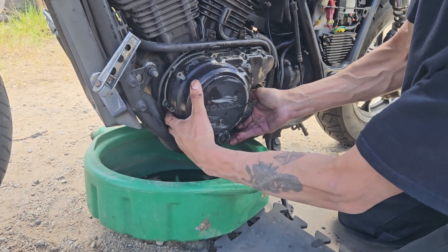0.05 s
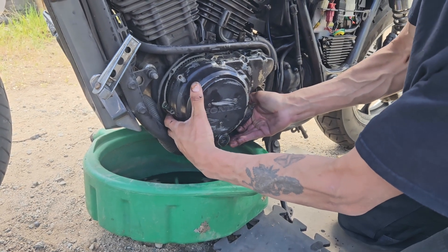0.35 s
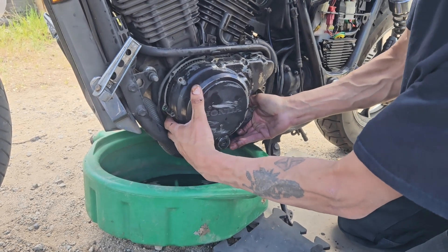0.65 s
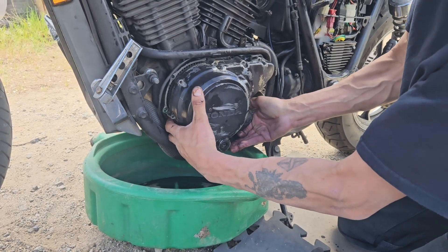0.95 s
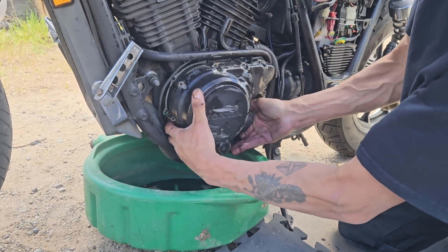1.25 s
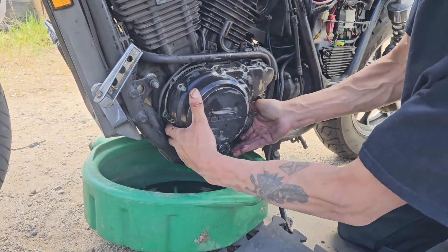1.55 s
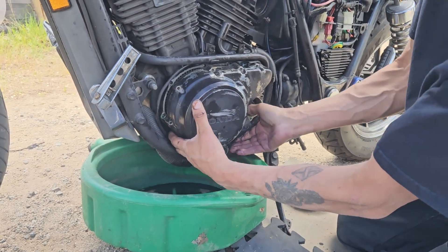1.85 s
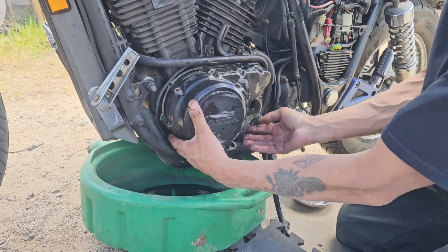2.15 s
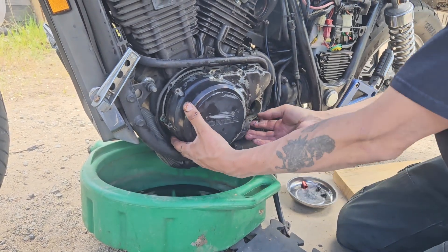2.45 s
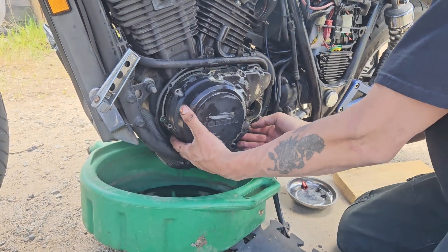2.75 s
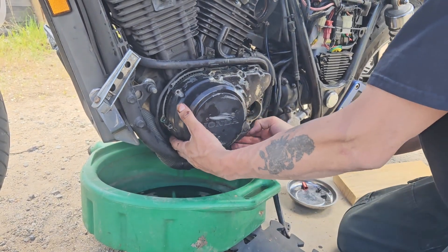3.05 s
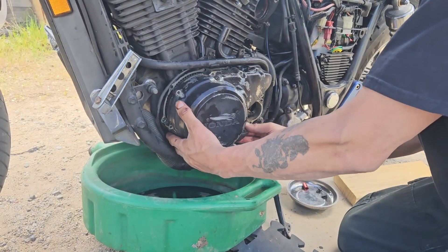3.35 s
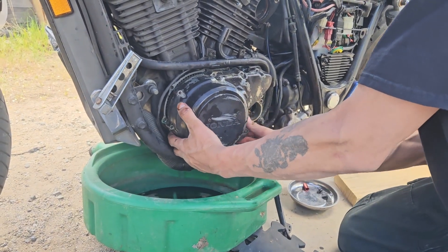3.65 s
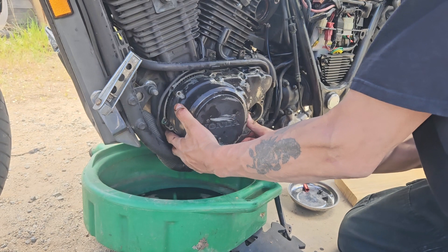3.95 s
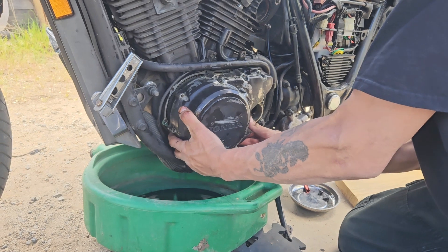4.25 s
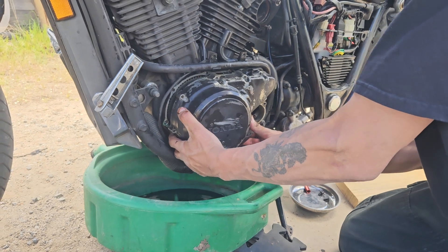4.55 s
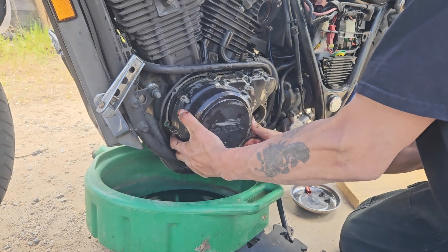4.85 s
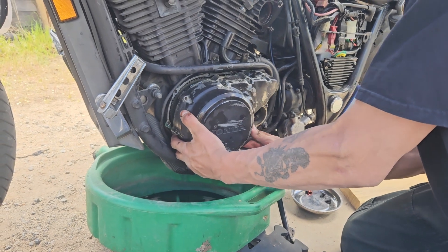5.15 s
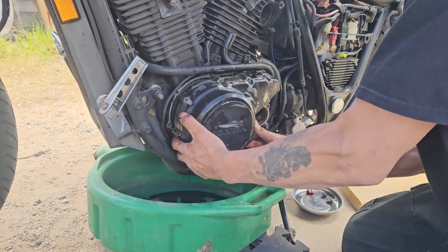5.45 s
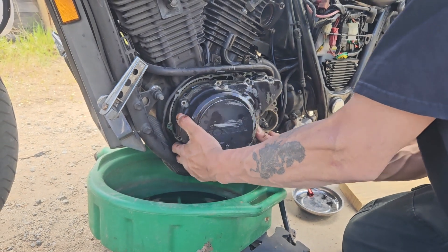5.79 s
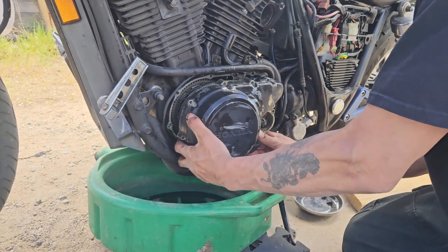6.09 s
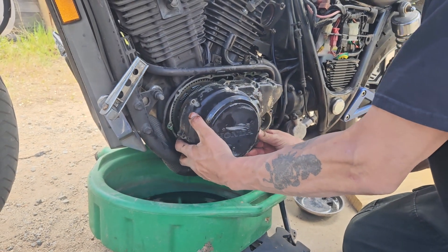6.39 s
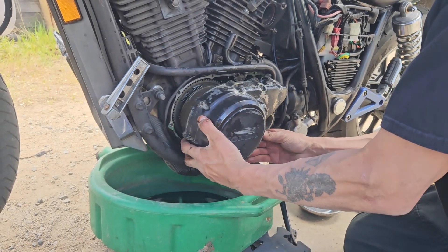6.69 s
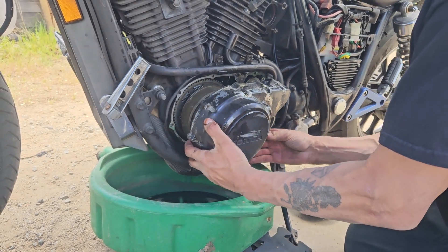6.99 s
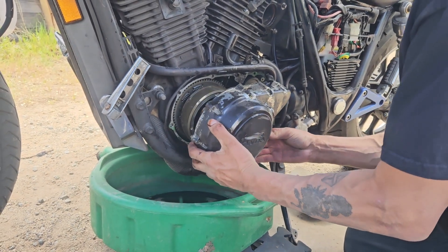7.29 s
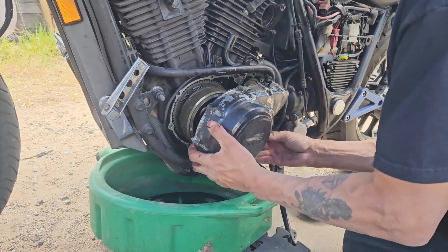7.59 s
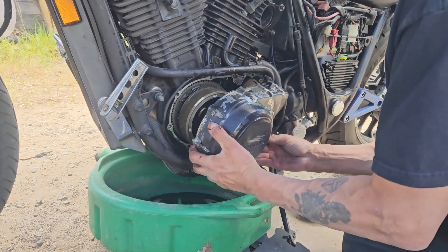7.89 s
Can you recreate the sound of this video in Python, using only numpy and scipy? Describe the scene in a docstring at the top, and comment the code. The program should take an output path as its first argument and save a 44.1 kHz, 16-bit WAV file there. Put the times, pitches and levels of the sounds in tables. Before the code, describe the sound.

Hands work a metal engine cover loose outdoors, with clinks, scrapes and knocks and one loud clank, over a low rumble.

```python
"""A cast metal side cover is rocked off a motorcycle engine by two hands, outdoors. It ticks, scrapes,
knocks on the crankcase and breaks free with one loud clank; each contact is a noise burst plus the
cover's ringing modes. The still-tight cover and small steel pieces clink, hands rub, clothes rustle.
Behind it an engine idles, a far exhaust booms as it revs through resonances, a far car horn toots
twice and songbirds whistle."""
import sys
import numpy as np
from scipy import signal
from scipy.fft import rfft, irfft
from scipy.io import wavfile
from scipy.ndimage import uniform_filter1d

SR = 44100
rng = np.random.default_rng(int(sys.argv[2]) if len(sys.argv) > 2 else 0)


def wrap_up_sound(samples):
    """Save the sound to the file named by the first command line argument, as 16-bit audio."""
    columns = np.atleast_2d(samples).T
    # keep every value between -1 and 1, then stretch to whole-number steps
    tamed = np.clip(columns, -1, 1)
    steps = np.round(tamed * 32767).astype(np.int16)
    wavfile.write(sys.argv[1], SR, steps)


N = 349713

# cover modes, tight on the gasket and loosened: pitch_hz, level_db, t60_s
TIGHT_MODES = [(676, 12, 0.16), (953, 18.5, 0.12), (1026, 28, 0.025), (1284, 8, .039), (1704, 14, 0.061),
               (3450, 14, 0.076), (4140, 18, 0.06), (4770, 20.5, 0.066), (5820, 1, 0.036),
               (7270, 28, 0.036), (8300, 21.5, .06)]
LOOSE_MODES = [(215, -7, .08), (452, -1, .07), (538, -9, .1), (780, -14, .06), (1001, -5, .05),
               (1138, 3.5, .07), (1328, -9, .05), (1412, -2, .06), (1580, -11, .05), (2038, -12, .05),
               (2195, -11, .06), (2438, -4, .08), (2826, -6, .07), (3275, -6, .07), (3450, -6, .05),
               (3644, -8, .05), (3751, -10, .06), (4179, -5, .07), (4543, -9, .05), (5340, -8, .07),
               (6061, -9, .07), (6436, 1, .06), (6688, -5, .07), (6864, -4, .06), (7075, -5, .07),
               (8260, -12, .06)]

def cover_modes(at_s, ratio=1, loose_s=1.5, grip_damping=.72):
    """The cover rings differently once loosened; the hands shorten the ring."""
    modes = TIGHT_MODES if at_s < loose_s else LOOSE_MODES
    return [(hz * ratio, db, t60 * grip_damping) for hz, db, t60 in modes]


# thud, clank, clink and fizz bands: low_hz, high_hz, side_db, ring_db
CONTACT_BANDS = [(200, 700, -11, -1), (700, 2200, -8, 0), (2450, 7900, -1, 0), (8500, 16000, 0, -10)]

def contact(rise_s, length_s, pan_db, levels_db, modes,
            edge_hz=2050, ring_db=-1, grit=.45, scatter_db=-14):
    """One grinding contact: a burst of tiny impacts that feeds the cover's modes."""
    t = np.arange(SR // 6) / SR
    force = np.minimum(t / rise_s, 1) * np.exp(-(np.maximum(t - rise_s / 2, 0) / length_s) ** 2)

    def decay(t60_s):
        """Envelope of a vibration fed by the force."""
        pole = np.exp(-2 * np.log(1000) / (t60_s * SR))
        return np.sqrt(signal.lfilter([1], [1, -pole], force ** 2))

    impacts = unit_rms(force * np.exp(grit * wobble(len(t), 30)))
    rebounds = gain(scatter_db) * unit_rms(decay(.12))  # among the engine parts
    crunch = unit_rms(np.hypot(impacts, rebounds) * rng.standard_normal((2, len(t))))
    ring = np.zeros_like(crunch)
    for hz, db, t60_s in modes:
        gripped_hz = hz * (1 + .003 * rng.standard_normal())
        cycles = gripped_hz * t + rng.random()
        cycles = cycles + np.array([[0], [rng.choice([-1, 1]) / 4]])  # side in quadrature
        ring += gain(db + 2.2 * rng.standard_normal()) * decay(t60_s) * np.sin(2 * np.pi * cycles)
    ring = unit_rms(ring) * gain(ring_db) * min((rise_s + length_s) / .011, 1)  # brief snaps ring less
    bands = np.array(CONTACT_BANDS, float)
    bands[1, :2] = .39 * edge_hz, edge_hz  # harder contact, higher clank band
    out = np.zeros_like(crunch)
    for (low_hz, high_hz, side_db, share_db), db in zip(bands, levels_db):
        mid, side = bandpass(crunch + gain(share_db) * ring, low_hz, high_hz, order=4)
        mid, side = unit_rms(mid), gain(side_db) * unit_rms(side)
        out += gain(db) * np.array([mid + side, mid - side])
    return out * np.sqrt(.02 / t[-1]) * pan(pan_db)  # levels count over 20 ms


# start_s, rise_s, length_s, pan_db, (thud_db, clank_db, clink_db, fizz_db)
RELEASE_BLOWS = [(5.8865, .002, 0.0053, 2, (-41, -26, -35.5, -52.5)),
                 (5.891, .002, .0065, 2.5, (-37, -30, -27.5, -48)),
                 (5.8983, .001, .0055, 2, (-46, -28, -32, -53.5))]

def release():
    """The cover breaks free: three blows merge into one clank."""
    out = np.zeros((2, N))
    for start_s, *blow in RELEASE_BLOWS:
        add(out, start_s, contact(*blow, cover_modes(start_s), ring_db=-3.5, grit=.5, scatter_db=-17))
    return out


# start_s, length_s, clank_db, thud_rel_db, clink_rel_db, pan_db, pitch_ratio, edge_hz
CRANKCASE_KNOCKS = [(0.625, 0.0056, -66, -22, -25, 0, 1.26, 1600),
                    (0.659, 0.0076, -59, -19, -13, -1, 1.2, 1800),
                    (1.11, 0.01, -47, -7, -20, 0, 1.09, 1400),
                    (1.121, 0.012, -51.5, -0.5, -13.5, -1, 1.1, 1500),
                    (1.304, 0.0067, -65.5, -3, -26, 0, 1.2, 1600),
                    (1.351, 0.0084, -68.5, 5, -15, -2, 0.98, 1700),
                    (2.136, 0.012, -46, -13, -11.5, 1, 0.95, 2250),
                    (2.773, .004, -60, 3.5, -16, 1, 0.86, 1600),
                    (2.789, .005, -54.5, 1.5, -6, -1, 0.78, 2200),
                    (2.865, 0.011, -61.5, 6, -12, 0, 1, 1600),
                    (2.991, 0.0079, -52.5, 4.5, -8, -2, 0.99, 2000),
                    (3.88, .017, -57.5, 3, -10.5, -0.5, 0.94, 1500),
                    (4.125, 0.01, -57.5, 9, -12.5, -1, 0.98, 1900),
                    (4.3142, 0.0033, -46.5, -7, -30, -0.5, 0.72, 1700),
                    (5.166, 0.02, -67.5, 15, -6.5, -2.5, 0.95, 1500),
                    (5.359, 0.0078, -46.5, 3.5, -2, 1.5, 0.98, 1300),
                    (5.635, 0.0044, -47, -1, -23, 0, 0.84, 2200),
                    (5.7793, 0.0042, -51.5, 17, -25, 3.5, 1.08, 1500),
                    (5.788, 0.0036, -53, 17.5, -27.5, -4.5, 1.01, 1400),
                    (5.83, 0.011, -44, -17, -13.5, 2, 1.02, 2000),
                    (5.854, 0.0081, -42, -16, -14.5, 0, 1.2, 1900),
                    (5.9405, 0.008, -35.5, -14, -16, 0.5, 0.99, 2100),
                    (6.003, .007, -53.5, -18, -8.5, -3, 1.13, 2200),
                    (6.094, 0.0046, -49.5, -18, -33, 2, 1.2, 2000),
                    (6.381, 0.0097, -37.5, -11, -30, -0.5, .98, 1750),
                    (6.472, 0.0039, -54, -9, -40, -1, 1, 1750),
                    (6.596, 0.0035, -63.5, -16, -21, 0, 1.1, 1800),
                    (6.686, 0.0056, -39.5, -21, -30.5, 2, 1.15, 1850)]

def knocks(rise_s=.00085, fizz_db=-14):
    """The cover hits the crankcase, ringing higher or lower with the grip."""
    out = np.zeros((2, N))
    for start_s, length_s, db, thud_db, clink_db, pan_db, ratio, edge_hz in CRANKCASE_KNOCKS:
        levels_db = db + np.array([thud_db, 0, clink_db, clink_db + fizz_db])
        modes = cover_modes(start_s, ratio)
        add(out, start_s, contact(rise_s, length_s, pan_db, levels_db, modes, edge_hz, ring_db=-6))
    return out


# start_s, length_s, clink_db, tilt_db_per_band, pan_db
RIM_SCUFFS = [(0.166, 0.045, -62, 5.5, -3), (0.232, 0.026, -66, -5, 0), (0.326, 0.019, -58.5, 3, 0),
              (0.4753, 0.0091, -52, 3, -0.5), (0.569, 0.014, -73.5, 1, 0), (0.657, 0.018, -63, 4, -1),
              (0.92, 0.013, -69.5, -9.5, -1), (0.979, 0.046, -64.5, -4.5, -2), (1.175, 0.018, -66.5, 1, 1),
              (1.223, 0.012, -74.5, -9.5, -3), (1.44, 0.03, -69.5, -3, -2), (1.484, 0.0051, -77, -1, 0),
              (1.576, .008, -77, -1, -2), (1.797, 0.015, -72, 1, 0), (1.858, 0.017, -78, 0, 0),
              (1.965, 0.0034, -55.5, 3.5, -2), (1.988, 0.0074, -51.5, 5.5, 3), (2.006, 0.0035, -56.5, 0, 0),
              (2.282, 0.019, -63, 4, -2), (2.725, 0.0084, -58.5, 5, 5), (2.918, 0.0089, -61, 5, -4),
              (3.335, 0.027, -64, 1.5, -6), (3.669, 0.0026, -61.5, -0.5, 7), (4.524, 0.029, -64.5, -4, 0),
              (4.64, 0.0067, -61, 10, -4), (5.04, 0.017, -73.5, 6, -1), (5.585, 0.062, -66, -5.5, -2),
              (6.495, 0.011, -68.5, 5.5, -1), (6.806, 0.0072, -73, 3, 0), (6.955, 0.011, -74, 5, -0.5),
              (7.618, 0.033, -69.5, 7, -2), (7.632, 0.032, -52.5, 2, -0.5)]

def scuffs(thud_db=-17, fizz_db=-14):
    """The rim ticks and scrapes; longer scrapes start more softly."""
    out = np.zeros((2, N))
    for start_s, length_s, db, tilt_db, pan_db in RIM_SCUFFS:
        levels_db = db + np.array([thud_db - 2 * tilt_db, -tilt_db, 0, fizz_db + tilt_db])
        modes = cover_modes(start_s)
        add(out, start_s, contact(.1 * length_s, length_s, pan_db, levels_db, modes, ring_db=-2.5))
    return out


# start_s, length_s, level_db, pan_db
GASKET_PEELS = [(4.75, 0.0076, -67, 1), (5.948, 0.024, -45, 0), (6.057, 0.024, -56, 1)]

def peels(rise_s=.0018, bands_db=(-17, -22, -9.5, -3)):
    """The oily gasket peels with a short fizz."""
    out = np.zeros((2, N))
    for start_s, length_s, db, pan_db in GASKET_PEELS:
        levels_db = db + np.array(bands_db)
        add(out, start_s, contact(rise_s, length_s, pan_db, levels_db, cover_modes(start_s)))
    return out


# one list per kind of clink: pitch_hz, level_db, t60_s
CLINK_MODES = [
    [(2331, -21, .09), (4781, 0, .066), (8339, -11, .07), (8624, -23, .12), (9981, -22, .065),
     (14470, -27, .1)],
    [(5115, -4, .12), (5288, -6, .1), (5917, -6, .1), (7980, -4, .1), (9201, 2, .12)],
    [(945, -2, .06), (1680, -3, .055), (3450, 0, .06), (4270, -10, .05), (5140, -9, .04), (6300, -10, .04),
     (7400, -6, .045)],
    [(3500, -7, .05), (4180, -3, .06), (4440, 0, .05), (5750, -4, .06), (6400, -7, .05), (7500, -9, .04)],
    [(1080, -3, .05), (2500, -7, .04), (3150, -7, .04), (4700, -5, .04), (5650, -4, .035), (8560, 0, .05)],
]
# start_s, level_db, rise_s, kind_index (rounded)
CLINKS = [(.24, -61, .003, 2), (.323, -50.5, .001, 3.5), (0.4768, -44.5, 0.00079, 2), (.652, -59, .001, 3),
          (.664, -60, .002, 0), (0.926, -53.5, 0.0018, 4), (1.12, -46.5, 0.0011, 0.5),
          (1.129, -48, 0.00086, 4), (1.168, -56, 0.0018, 3.5), (1.225, -59, 0.0023, 4),
          (1.967, -44.5, .0007, 0.5), (1.99, -25.5, 0.0008, 0), (4.19, -57, .002, 1),
          (5.83, -39.5, 0.0022, 2.5), (6.086, -37, 0.019, 0.5), (6.199, -56.5, 0.0049, 1.5),
          (7.634, -43, 0.00081, -0.5)]

def clinks():
    """Clear metallic clinks: the still-tight cover and small steel pieces ring."""
    out, t = np.zeros((2, N)), np.arange(SR // 4) / SR
    for start_s, level_db, rise_s, kind in CLINKS:
        for hz, db, t60_s in CLINK_MODES[round(kind)]:
            phase = rng.random() + np.array([[.1], [-.1]])  # ears out of step
            envelope = gain(level_db + db - 60 * t / t60_s) * np.minimum(t / rise_s, 1)
            add(out, start_s, envelope * np.sin(2 * np.pi * (hz * t + phase)))
    return out


# start_s, length_s, level_db, centre_hz
RIM_DRAGS = [(0.232, 0.09, -68, 1150), (0.298, 0.14, -62, 850), (0.371, 0.061, -68.5, 950),
             (0.448, .04, -68, 1000), (0.769, 0.034, -72, 1000), (0.986, 0.078, -66, 1100),
             (1.133, 0.14, -70, 1000), (1.351, 0.045, -70, 1050), (3.859, 0.11, -62.5, 900),
             (4.321, 0.047, -56, 900), (4.354, 0.11, -63.5, 1200), (5.323, 0.067, -59, 650),
             (5.371, 0.087, -58.5, 900), (5.637, 0.064, -58.5, 1200), (6.037, 0.24, -64.5, 700),
             (6.344, 0.056, -62.5, 900), (6.383, 0.042, -49.5, 1100), (6.658, 0.048, -59.5, 1100),
             (6.698, 0.075, -59.5, 1200)]

def drags(rise_s=.0081, band_ratio=1.5, grit=.25):
    """The rim grinds dully on the gasket face in uneven slips."""
    out = np.zeros((2, N))
    for start_s, length_s, db, hz in RIM_DRAGS:
        t = np.arange(0, length_s, 1 / SR)
        slips = np.exp(grit * wobble(len(t), 120)) * rng.standard_normal((2, len(t)))
        mid, side = bandpass(slips, hz / band_ratio, hz * band_ratio, order=2)
        envelope = np.minimum(t / rise_s, 1) * (1 - t / length_s) ** 1.2
        add(out, start_s, gain(db) * unit_rms(envelope * np.array([mid + .35 * side, mid - .26 * side])))
    return out


# start_s, gain_db, low_hz, high_hz, pan_db
DRY_CRACKS = [(2.7268, -57, 890, 8100, -3), (2.7784, -71, 2500, 12000, 0), (2.8334, -57, 1790, 5400, 0),
              (2.8416, -63, 2600, 4660, -12), (2.9594, -71, 2500, 8900, -5), (3.0223, -70, 3000, 9000, -3),
              (3.064, -77, 3000, 11000, -4), (4.641, -72, 2000, 9000, -12), (5.2365, -55.5, 1720, 4200, -6)]

def cracks(decay_s=.0004, tail_db=-22, tail_t60_s=.04):
    """Sharp snaps with a short scatter and no ring."""
    out, t = np.zeros((2, N)), np.arange(SR // 20) / SR
    envelope = np.exp(-t / decay_s) + gain(tail_db - 60 * t / tail_t60_s)
    for start_s, db, low_hz, high_hz, pan_db in DRY_CRACKS:
        mid, side = bandpass(envelope * rng.standard_normal((2, len(t))), low_hz, high_hz)
        snap = unit_rms(unit_rms(mid) + np.array([[.6], [-.6]]) * unit_rms(side))
        add(out, start_s, snap * np.sqrt(t[-1] / .02) * gain(db) * pan(pan_db))
    return out


# start_s, length_s, level_db
HAND_STROKES = [(-.02, 0.36, -66), (0.99, 0.16, -65), (1.888, 0.26, -60), (2.253, 0.23, -65.5),
                (3.3, 0.092, -63.5), (4.296, 0.37, -66.5), (5.394, 0.71, -70.5), (5.817, 0.13, -45.5),
                (5.945, 0.02, -51), (6.05, 0.044, -52), (6.07, 0.14, -68), (6.209, 0.2, -64),
                (6.619, 0.082, -62), (7.24, 0.22, -66.5)]
# faint rub between strokes: time_s, level_db
GRIP_RUB = [(0, -70), (1.2, -75), (1.7, -76.5), (2.4, -74), (3.2, -69), (4.2, -68), (5.7, -78),
            (6.4, -73.5), (7.6, -73), (7.76, -82.5)]
# freq_hz, density_db
RUB_SPECTRUM = [(150, 8.5), (400, 6), (1100, 4), (2500, -4.5), (5000, -14.5), (8300, -3), (11000, -19),
                (16000, -16)]

def rubbing(attack_s=.0097, steel_db=-12.5, steel_hz=4780, steel_width_hz=300):
    """Hands slide over the metal in catches and surges; sliding steel sings faintly in the strokes."""
    t, power = np.arange(N) / SR, 0
    for start_s, length_s, db in HAND_STROKES:
        attack = np.clip((t - start_s) / attack_s, 0, 1)
        fade = np.exp(-np.maximum(t - start_s - length_s, 0) / (.52 * length_s))
        power += (gain(db) * attack * fade) ** 2
    strokes, grip = np.sqrt(power), gain(curves(GRIP_RUB)[0])
    catches = np.exp(.26 * wobble(N, 90))
    surges = gain(1.1 * wobble(N, 900))
    slide = unit_rms(stereo_noise(RUB_SPECTRUM, patchy_db=4.8) * catches * surges)
    steel = unit_rms(signal.lfilter(*signal.iirpeak(steel_hz, steel_hz / steel_width_hz, SR), slide))
    return np.hypot(strokes, grip) * slide + strokes * gain(steel_db) * steel


# peak_s, rise_s, fall_s, level_db
CLOTH_SWELLS = [(2.59, 0.058, .03, -60.5), (2.609, 0.014, 0.043, -48), (2.785, 0.043, 0.046, -52),
                (2.895, 0.06, 0.078, -50.5), (2.975, 0.034, 0.05, -52)]
# freq_hz, density_db
CLOTH_SPECTRUM = [(150, -3), (280, 6.5), (640, 1.5), (920, 2), (2200, 0.5), (2900, -7.5), (5000, -5),
                  (7500, -3), (9600, -10), (13200, -13), (16000, -16)]

def clothes(ticks_per_s=420, grit_db=-6, fold_db=1.9, fold_s=.012):
    """Cloth rustles as the body shifts; gritty ticks clump where folds give way."""
    t, power = np.arange(N) / SR, 0
    for peak_s, rise_s, fall_s, db in CLOTH_SWELLS:
        power += (gain(db) * np.exp(-np.maximum((peak_s - t) / rise_s, (t - peak_s) / fall_s))) ** 2
    catches = np.exp(.17 * wobble(N, 60))
    folds = gain(fold_db * np.interp(t / fold_s, np.arange(1000), rng.uniform(-1.7, 1.7, 1000)))
    grit = 0
    for low_hz, high_hz in [(1800, 5400), (4000, 9800), (7500, 12000)]:
        ticks = (rng.random(N) < ticks_per_s / 3 / SR) * rng.standard_normal((2, N))
        grit += bandpass(ticks, low_hz, high_hz, order=2)
    cloth = unit_rms(stereo_noise(CLOTH_SPECTRUM, patchy_db=2.5) * catches * folds)
    return np.sqrt(power) * (cloth + gain(grit_db) * unit_rms(grit * folds ** 2))


# time_s, shaft_hz, level_db
IDLE_CURVE = [(0, 23.6, -62), (1.3, 23.2, -58), (1.7, 23.1, -50), (2.5, 23.1, -49), (3.1, 23.2, -47),
              (4.0, 23.3, -48.5), (4.5, 23.2, -48.5), (4.9, 22.9, -49.5), (5.3, 23.0, -58),
              (6.1, 23.5, -55), (7.0, 23.1, -58), (7.93, 23.6, -58)]
# shaft_multiple, level_db
IDLE_ORDERS = [(3, 4), (4, -12), (5, -6), (6, -15.5), (7, -24), (9, -37.5)]

def idling_engine():
    """An engine hums on low orders of its shaft speed."""
    shaft_hz, level_db = curves(IDLE_CURVE)
    return gain(level_db) * unit_rms(harmonics(shaft_hz, IDLE_ORDERS))


# run through the gears: time_s, pitch_hz, throttle_db
EXHAUST_CURVE = [(0, 54, -20), (.4, 59, 6), (.95, 67, 6), (1.4, 78, -4), (2.0, 87, -7.5), (2.4, 94, 8.5),
                 (3.3, 108, -21), (4.1, 110, -8), (4.45, 74.08, -16), (4.75, 78, -3.5), (4.98, 81, -16),
                 (5.1, 106, -3.5), (5.75, 109, -5), (6.35, 117, -0.5), (6.65, 105, -13), (6.82, 89, -5.5),
                 (7.5, 78, -7), (7.93, 70, -7.5)]
# centre_hz, level_db
RESONANCES = [(59, -59), (67, -65), (78, -43.5), (86.8, -42), (107, -46), (117, -48.5)]

def exhaust(width_hz=3.2, floor_db=-64.5, overtone_db=-17):
    """A far exhaust booms where its pitch meets a resonance of the surroundings."""
    pitch_hz, throttle_db = curves(EXHAUST_CURVE)
    boom = sum(gain(db) * np.exp(-((pitch_hz - hz) / width_hz) ** 2) for hz, db in RESONANCES)
    phase = 2 * np.pi * (np.cumsum(pitch_hz) / SR + rng.random())
    overtone = gain(overtone_db) * bandpass(np.sin(2 * phase), 110, 130, order=2)
    return gain(throttle_db) * (gain(floor_db) + boom) * unit_rms(np.sin(phase) + overtone)


# start_s, length_s, level_db
HORN_TOOTS = [(3.461, 0.054, -54.5), (3.651, 0.055, -55.5)]
# one list per diaphragm: multiple, level_db
DIAPHRAGM_PARTIALS = [
    [(2, -22), (3, -14), (4, -7.5), (5, 0), (6, -12), (7, -27), (8, -16.5)],
    [(2, -4), (3, -8.5), (4, -9), (5, -8.5), (6, -30)],
]
# delay_s, level_db
WALL_ECHOES = [(.03, -18), (.072, -16), (.13, -23)]

def horn(pitches_hz=(405, 465), waver=.007, rasp_db=-9, echo_db=-14):
    """Two diaphragms of a far car horn buzz; walls throw the toots back."""
    out = np.zeros(N)
    for start_s, length_s, level_db in HORN_TOOTS:
        n, tone = round(length_s * SR), 0
        for hz, partials in zip(pitches_hz, DIAPHRAGM_PARTIALS):
            tone += harmonics(hz * (1 + waver * wobble(n, 150)), partials)
        rasp = gain(rasp_db) * unit_rms(bandpass(rng.standard_normal(n), 1200, 2650))
        toot = gain(level_db) * unit_rms((unit_rms(tone) + rasp) * signal.windows.tukey(n, .8))
        add(out, start_s, toot)
        for delay_s, db in WALL_ECHOES:
            add(out, start_s + delay_s, gain(db) * toot)
    return out + gain(echo_db) * echoes(out, t60_s=.6, top_hz=4000)


# one bird's arched call: time_s, pitch_hz, level_db
CALL_SHAPE = [(0, 2100, -6), (.035, 2950, -3), (.06, 3300, 0), (.085, 3200, 0), (.1, 2550, -2),
              (.12, 2350, 2), (.165, 2320, -4), (.21, 2250, -16)]
# its repeats: start_s, level_db, pitch_ratio
BIRD_CALLS = [(4.609, -77.5, 0.94), (4.969, -74.5, 0.93), (5.38, -76, 0.96), (6.259, -73.5, 0.94),
              (6.72, -75.5, 1.02), (7.17, -73.5, 1)]
# other birds: start_s, length_s, start_hz, end_hz, level_db
BIRD_WHISTLES = [(0.476, 0.11, 2000, 2150, -74), (1.205, 0.074, 2470, 2300, -75),
                 (1.419, 0.54, 1767, 1654, -75), (2.257, 0.071, 1660, 1620, -69),
                 (3.114, 0.14, 727, 644, -73), (3.582, 0.078, 1240, 1660, -70),
                 (3.739, 0.087, 1114, 1450, -72), (4.778, 0.12, 1665, 1930, -70.5),
                 (6.031, .28, 760, 599, -67.5), (6.646, 0.41, 3860, 3984, -84)]

def songbirds(direct_db=-14, echo_db=-1.5):
    """Far warbling glides, smeared by their echoes."""
    out = np.zeros(N)

    def sing(start_s, hz, envelope, db, warble):
        """A sine wavering about its pitch."""
        hz = hz * (1 + warble * wobble(len(hz), 260))
        add(out, start_s, gain(db) * unit_rms(envelope * np.sin(2 * np.pi * np.cumsum(hz) / SR)))

    call_s, call_hz, call_db = np.transpose(CALL_SHAPE)
    t = np.arange(0, call_s[-1], 1 / SR)
    envelope = gain(np.interp(t, call_s, call_db)) * signal.windows.tukey(len(t), .2)
    for start_s, db, ratio in BIRD_CALLS:
        sing(start_s, ratio * np.interp(t, call_s, call_hz), envelope, db, warble=.048)
    for start_s, length_s, start_hz, end_hz, db in BIRD_WHISTLES:
        n = round(length_s * SR)
        sing(start_s, np.linspace(start_hz, end_hz, n), signal.windows.hann(n), db, warble=.024)
    return gain(direct_db) * out + gain(echo_db) * echoes(out, t60_s=.45, top_hz=5065)


# freq_hz, density_db
RUMBLE_SPECTRUM = [(15, -55), (27, -33), (42, -11.5), (80, -11), (125, -16), (217, -32.5), (256, -33.5),
                   (309, -37.5), (503, -44), (677, -43.5), (796, -45.5), (1230, -48.5), (1600, -51),
                   (2110, -52), (7710, -73.5), (16000, -94)]

def rumble(level_db=-49.5):
    """Steady low outdoor noise."""
    return gain(level_db) * stereo_noise(RUMBLE_SPECTRUM, patchy_db=2)


# freq_hz, left_right_correlation
COHERENCE = [(60, 1), (250, 0.9), (1000, 0.18), (3000, 0.025), (8000, 0.013), (16000, 0)]

def stereo_noise(spectrum, patchy_db):
    """Coloured noise with drifting patches, wider in the treble, rms 1."""
    frames, hz = N // 512 + 5, np.fft.rfftfreq(2048, 1 / SR)
    a, b, c, d, patches = rng.standard_normal((frames, len(hz), 5)).T
    patches = unit_rms(uniform_filter1d(uniform_filter1d(patches, 8, axis=0), 8, axis=1))
    coherence = log_interp(COHERENCE, hz)[:, None]
    left = a + 1j * b
    right = coherence * left + np.sqrt(1 - coherence ** 2) * (c + 1j * d)
    bins = np.array([left, right]) * gain(log_interp(spectrum, hz)[:, None] + patchy_db * patches)
    return unit_rms(signal.istft(bins, nperseg=2048, noverlap=1536)[1][:, :N])


def echoes(x, t60_s, top_hz):
    """Dull diffuse reflections, different in each ear."""
    t = np.arange(SR) / SR
    tail = bandpass(rng.standard_normal((2, SR)), 150, top_hz, order=1)
    tail *= gain(-60 * t / t60_s) * np.minimum(t / .0024, 1)
    return signal.fftconvolve(np.atleast_2d(x), tail / np.linalg.norm(tail[0]), axes=1)[:, :N]


def harmonics(hz, partials):
    """Random-phase sines on multiples of a pitch curve."""
    cycles = np.cumsum(hz) / SR
    return sum(gain(db) * np.sin(2 * np.pi * (k * cycles + rng.random())) for k, db in partials)


def wobble(n, window_samples):
    """Smoothed noise, rms 1."""
    return unit_rms(uniform_filter1d(rng.standard_normal(n), window_samples))


def gain(db):
    return 10 ** (np.asarray(db) / 20)


def pan(db):
    """Channel gains, left over right by db."""
    return gain([[db / 2], [-db / 2]])


def unit_rms(x):
    return x / np.sqrt(np.mean(x ** 2) + 1e-20)


def log_interp(points, hz):
    freq_hz, value = np.transpose(points)
    return np.interp(np.log(hz + 1), np.log(freq_hz + 1), value)


def curves(rows):
    """Columns of a timed table at every sample."""
    time_s, *columns = np.transpose(rows)
    return [np.interp(np.arange(N) / SR, time_s, column) for column in columns]


def add(mix, start_s, sound):
    part = mix[..., max(round(start_s * SR), 0):][..., :sound.shape[-1]]
    part += sound[..., :part.shape[-1]]


def bandpass(x, low_hz, high_hz, order=3):
    return signal.sosfilt(signal.butter(order, [low_hz, high_hz], "band", fs=SR, output="sos"), x)


def scene(yard_db=-29):
    """Close work with a faint yard echo, over the outdoor sounds."""
    metal = knocks() + scuffs() + peels() + release() + clinks() + drags() + cracks()
    work = metal + gain(yard_db) * echoes(metal, t60_s=.36, top_hz=2462) + rubbing() + clothes()
    return work + idling_engine() + exhaust() + rumble() + horn() + songbirds()


# freq_hz, gain_db
MIC_RESPONSE = [(20, 0), (8800, 0), (9500, -10), (10400, -9), (11400, 0), (16000, 0)]

def record(dry):
    """Microphone treble dip, then a 16.1 kHz low-pass."""
    response = gain(log_interp(MIC_RESPONSE, np.fft.rfftfreq(N, 1 / SR)))
    coloured = irfft(rfft(dry) * response, N)
    lowpass = signal.firwin(511, 16100, window=("kaiser", 9), fs=SR)
    return signal.oaconvolve(coloured, lowpass[None], "same")


dry = scene()
out = record(dry)
wrap_up_sound(out)
```